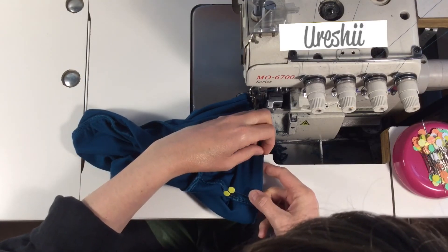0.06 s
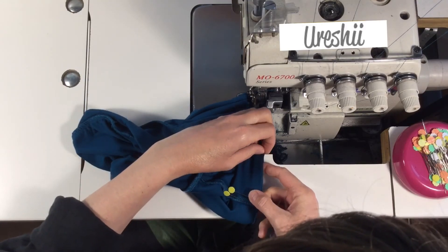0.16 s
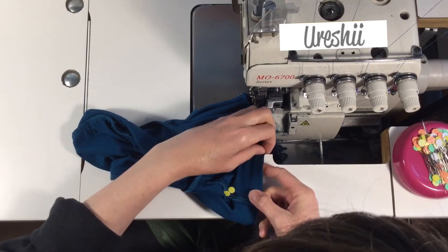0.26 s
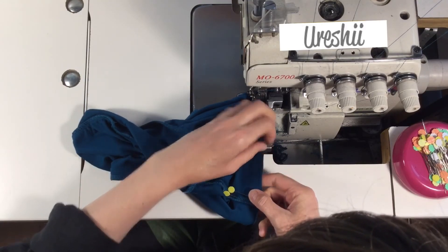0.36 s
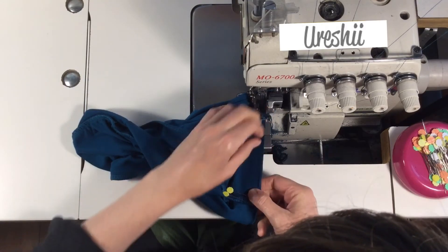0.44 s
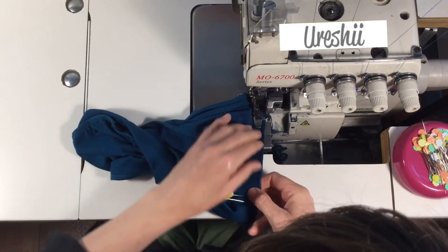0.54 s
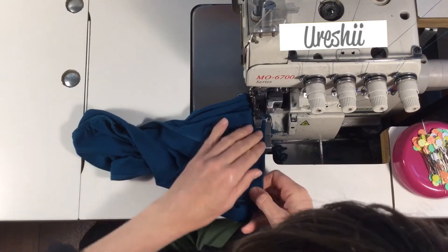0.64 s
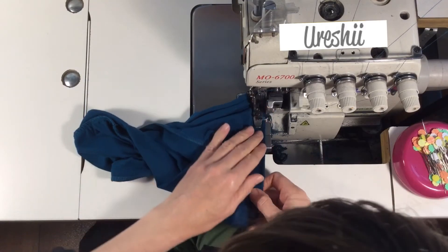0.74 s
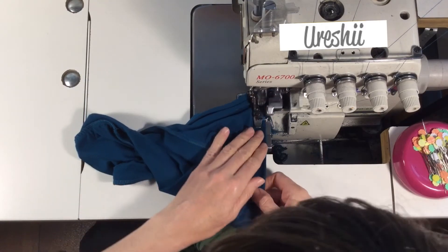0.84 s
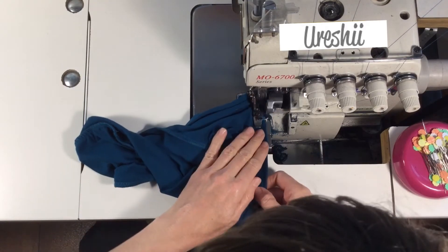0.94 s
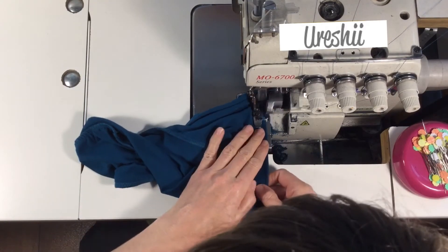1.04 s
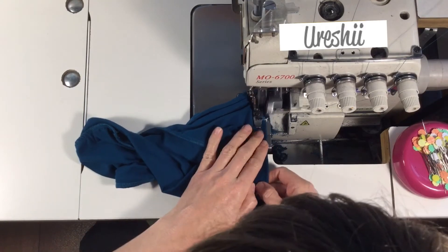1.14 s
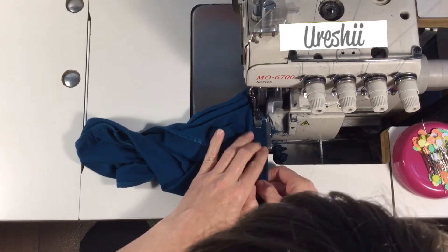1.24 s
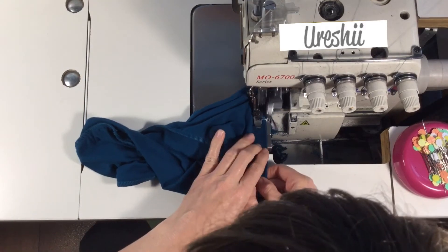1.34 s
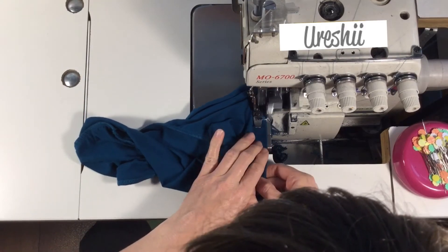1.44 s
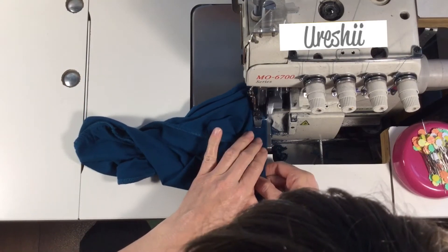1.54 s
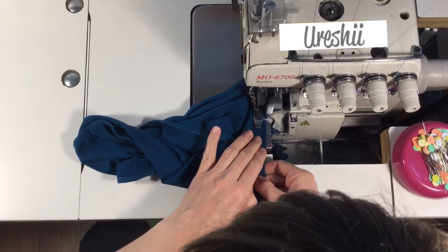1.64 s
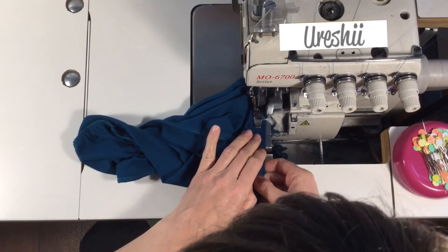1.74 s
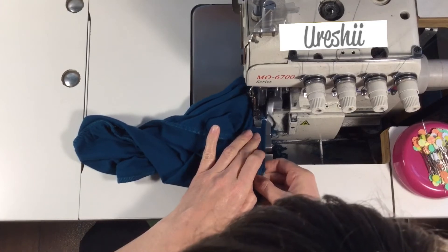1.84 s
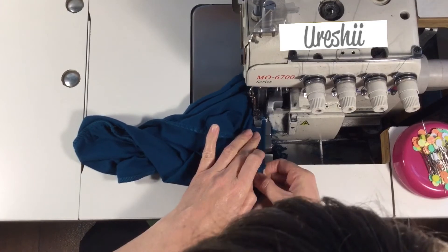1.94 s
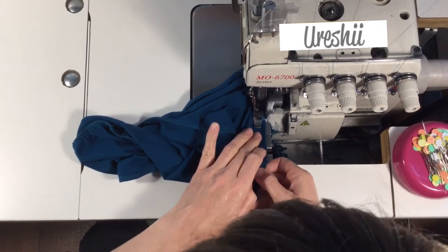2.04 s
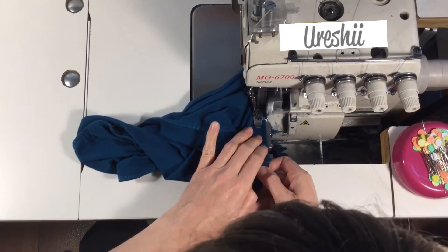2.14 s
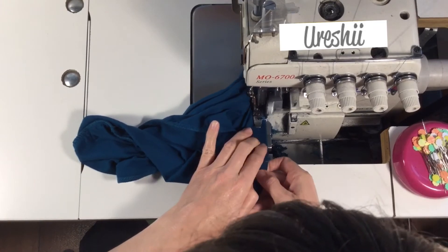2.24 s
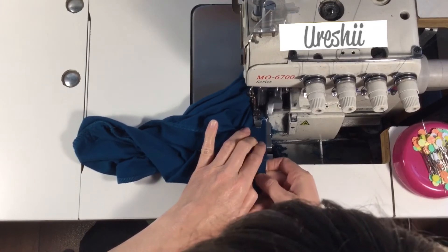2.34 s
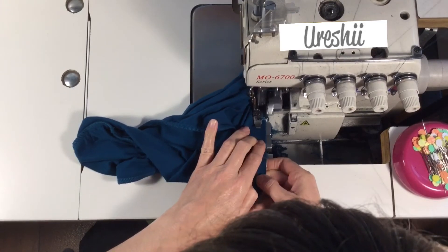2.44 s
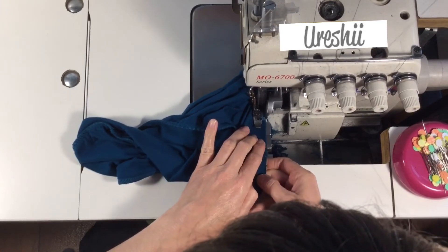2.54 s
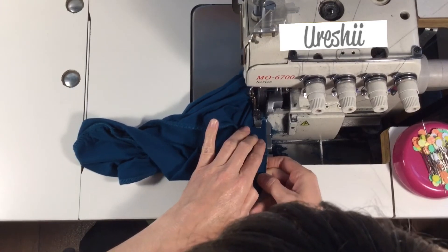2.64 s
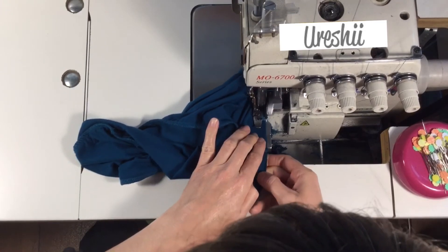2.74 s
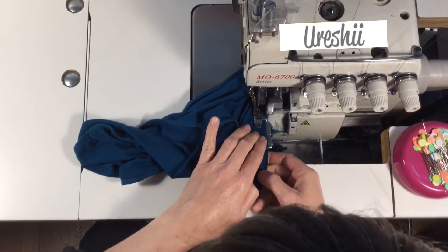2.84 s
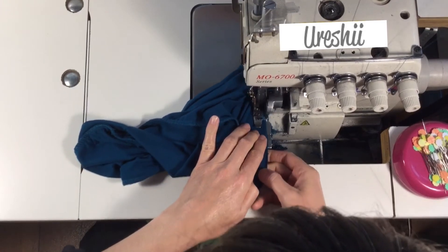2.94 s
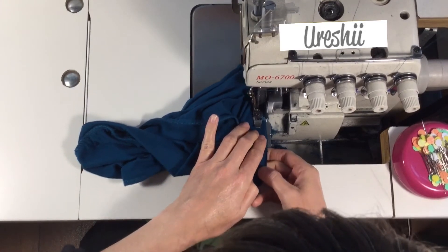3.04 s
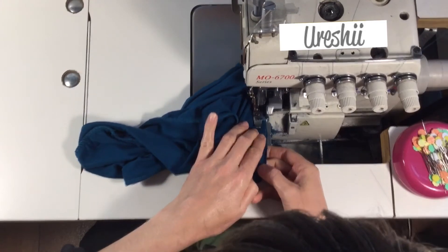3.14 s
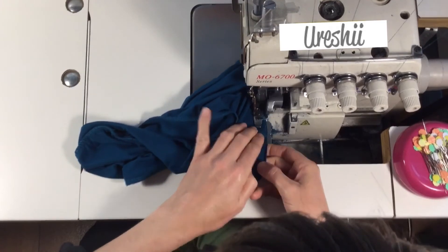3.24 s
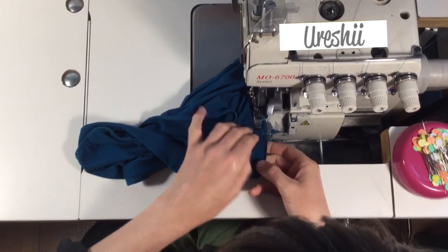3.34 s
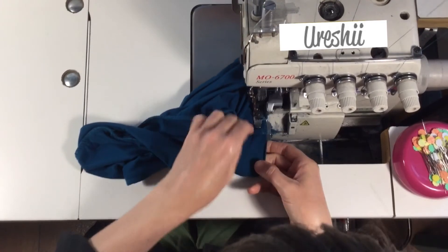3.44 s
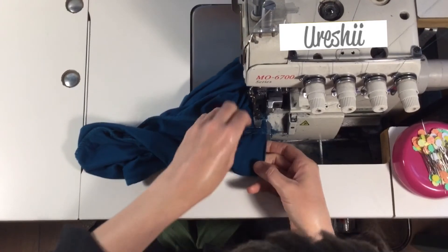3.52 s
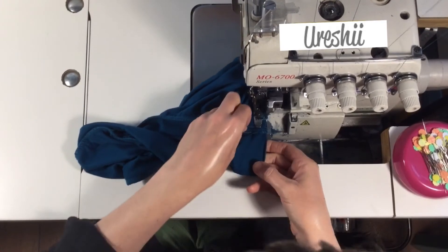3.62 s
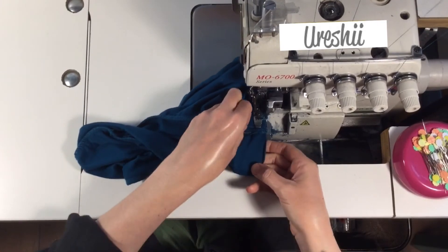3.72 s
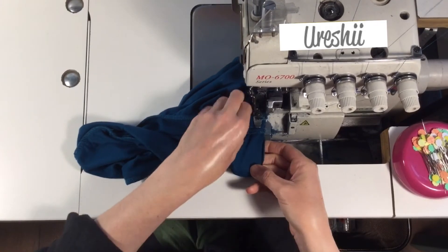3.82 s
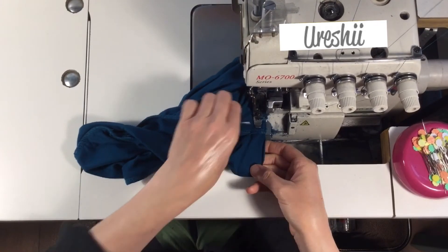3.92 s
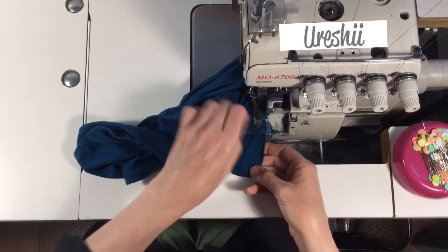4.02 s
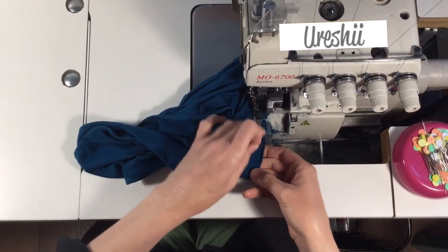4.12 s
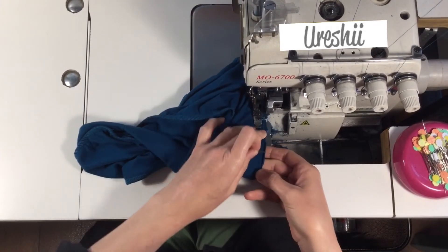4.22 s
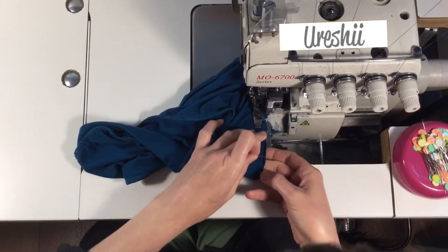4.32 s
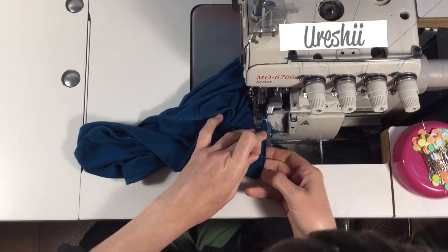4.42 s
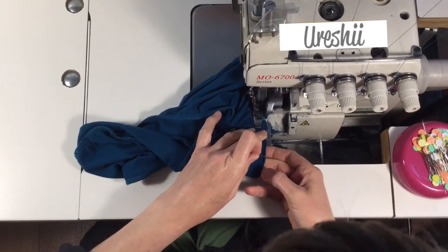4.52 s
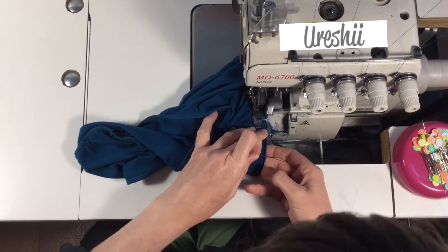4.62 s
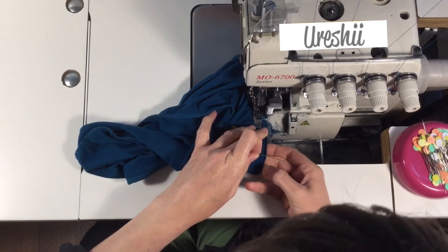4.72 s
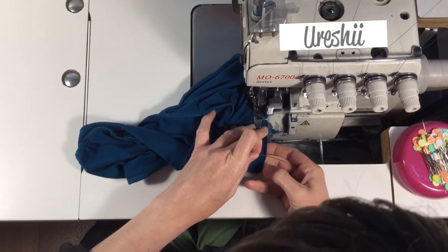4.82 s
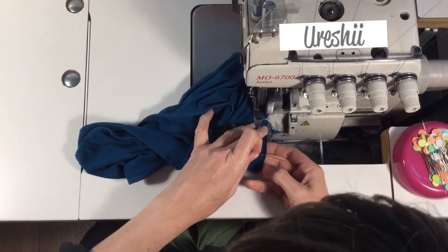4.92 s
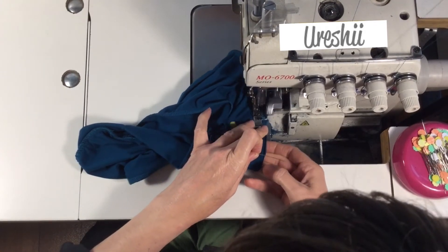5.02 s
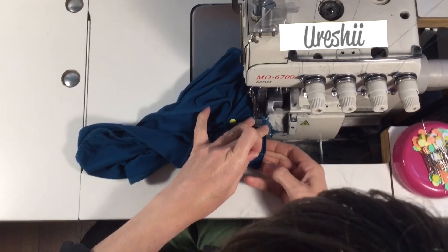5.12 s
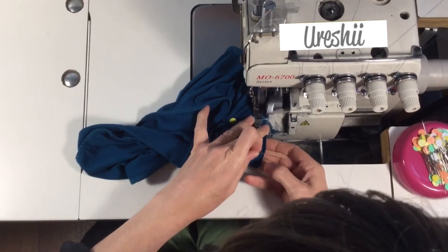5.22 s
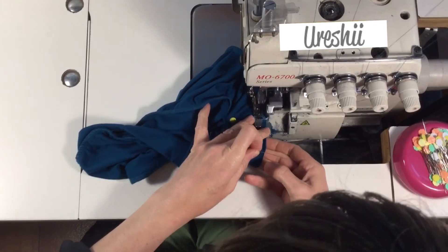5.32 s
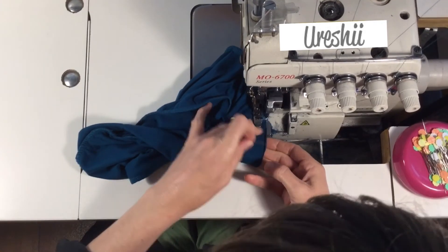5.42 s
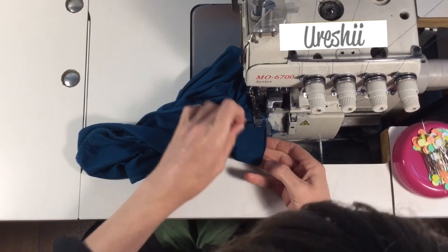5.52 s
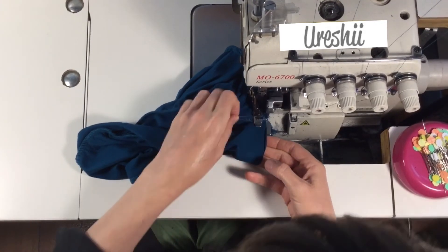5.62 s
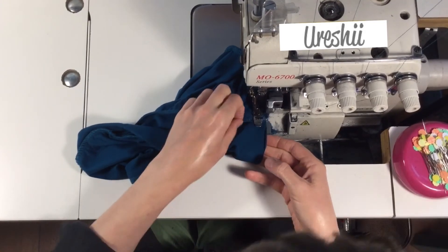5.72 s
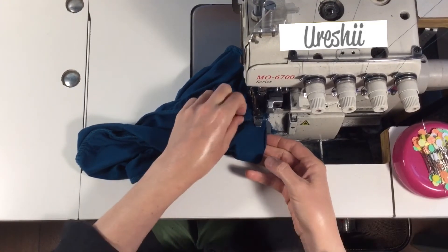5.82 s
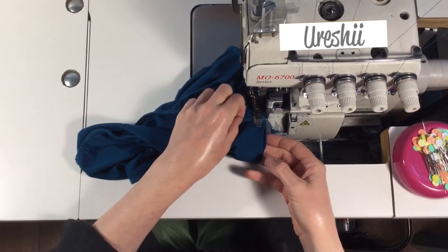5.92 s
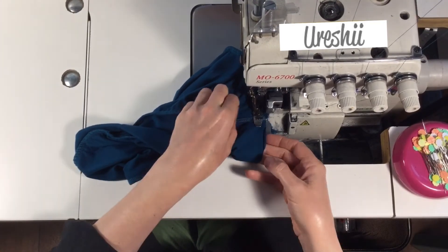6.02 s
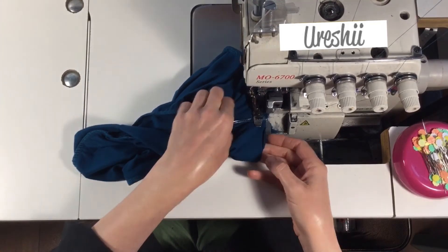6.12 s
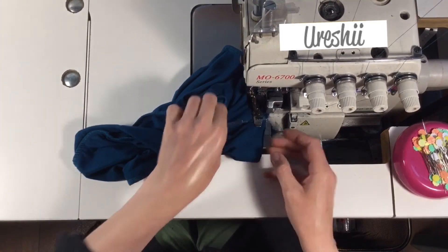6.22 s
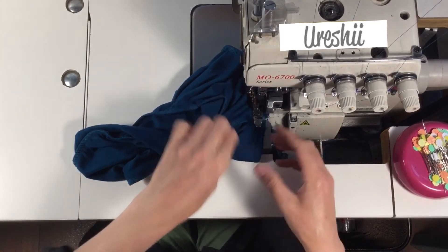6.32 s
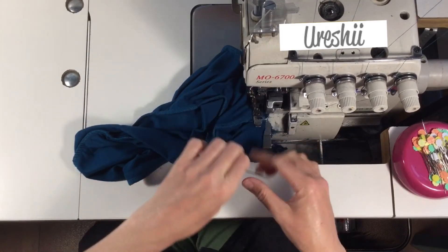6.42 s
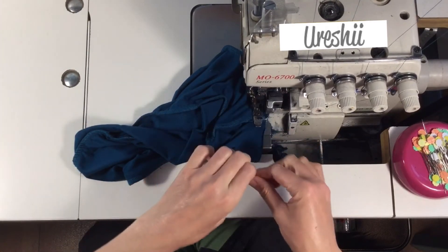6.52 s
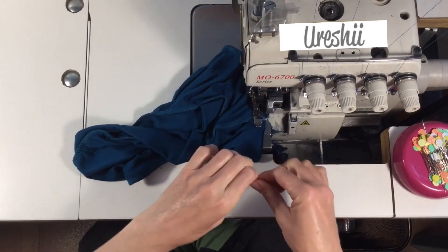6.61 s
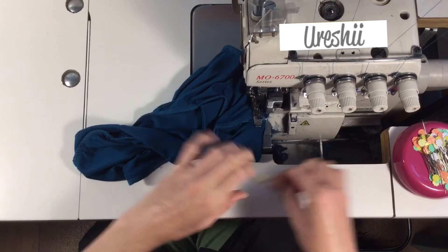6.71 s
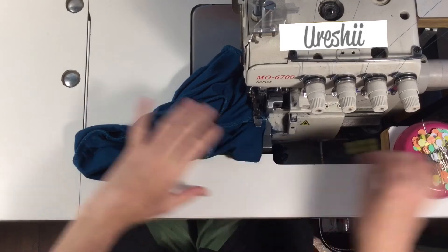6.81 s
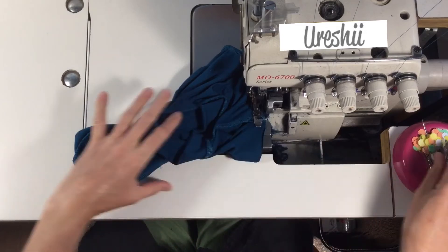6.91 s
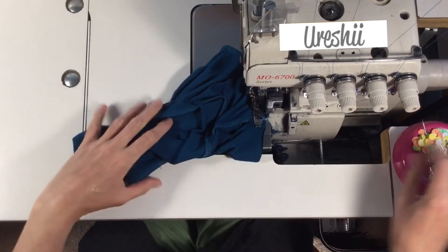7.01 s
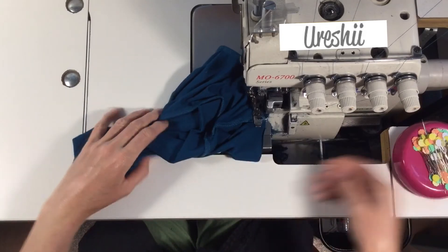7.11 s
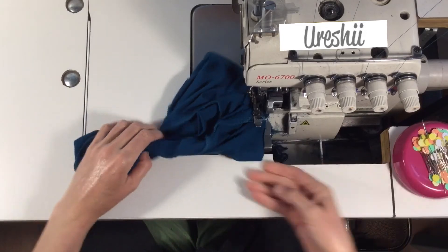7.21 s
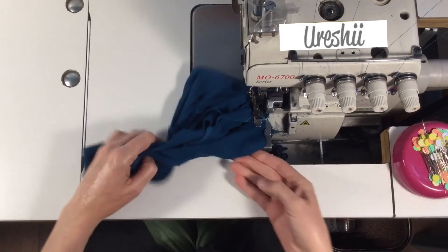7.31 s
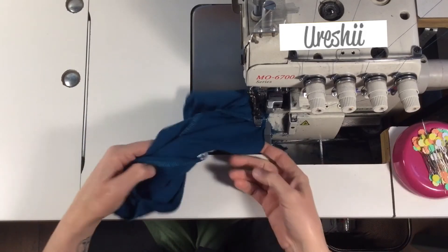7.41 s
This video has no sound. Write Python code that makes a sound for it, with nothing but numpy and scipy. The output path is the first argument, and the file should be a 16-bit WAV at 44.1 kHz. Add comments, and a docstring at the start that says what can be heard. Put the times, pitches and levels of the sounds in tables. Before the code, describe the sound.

An overlock sewing machine runs in two whining, clattering bursts, followed by the small clink of a tossed pin.

```python
"""Overlocker, two bursts.

In a small quiet room the pedal clunks and the clutch grabs a ringing pulley. The drive whines with
shaft speed, the linkage clatters, the table shakes and the knife snaps once a stitch until the brake
scrapes the machine to rest. Then a tossed pin skitters in a dish of pins and hands slide the fabric away."""
import sys
import numpy as np
from scipy import signal
from scipy.fft import rfft, irfft, next_fast_len
from scipy.io import wavfile
from scipy.ndimage import uniform_filter1d, map_coordinates

SR = 44100
rng = np.random.default_rng(int(sys.argv[2]) if len(sys.argv) > 2 else 0)


def dump(signal):
    """Clip the signal to [-1, 1] and save it as 16-bit WAV at the path in sys.argv[1]."""
    limited = np.clip(np.atleast_2d(signal).T, -1, 1)
    pcm = np.round(limited * 32767).astype(np.int16)
    wavfile.write(sys.argv[1], SR, pcm)


N = 328986
TIME_S = np.arange(N) / SR

# Table levels are relative; each source adds its own mix gains.
# shaft speed, one stitch a turn: time_s, turns_per_s
LONG_RUN = [(0.736, 3.69), (0.97, 6.91), (1.12, 15.08), (1.22, 21.26), (1.37, 22.72), (1.56, 19.19),
            (1.85, 18.34), (2.27, 18.97), (2.49, 17.31), (2.98, 17.33), (3.23, 16.21), (3.37, 8.34),
            (3.6, 1.0)]
SHORT_RUN = [(4.327, 4.61), (4.44, 5.16), (4.79, 10.54), (5.01, 17.35), (5.14, 16.52), (5.23, 8.7),
             (5.3, 5.0), (5.5, 1.0)]
# sewing bursts: speed_curve, clutch_release_s, snap_db
BURSTS = [(LONG_RUN, 3.24, -33.3), (SHORT_RUN, 5.14, -37)]
# knife bite into the cloth: time_s, level_db
BITE_CURVE = [(0.84, -46), (1.0, -35), (1.2, -34), (1.38, -34), (1.98, -31.5), (2.17, -39), (2.65, -33.5),
              (2.76, -39.5), (3.2, -32), (3.35, -47), (4.42, -45.5), (4.7, -44.5), (4.93, -34.5),
              (5.13, -34)]
# hard cuts through folds: time_s, extra_bite_db
FOLDS = [(1.207, 6), (1.96, 2.5), (3.2, 3.5), (4.805, 4.5)]
# whine partials: pitch_ratio
WHINE_RATIOS = [1, 2, 3, 3.5, 4]
# drive tone radiation from machine and table: pitch_hz, level_db
RADIATION = [(90, -72), (165, -53.5), (200, -54), (262, -61.5), (305, -39.5), (345, -55.5), (400, -45),
             (435, -51), (515, -47), (600, -57), (790, -58), (855, -51.5), (1030, -58), (1250, -57),
             (1560, -57.5), (2100, -69)]

# impacts: start_s, level_db
HEM_CLACKS = [(1.205, -36), (1.254, -44)]
CLUTCH_GRABS = [(0.735, -44.5), (4.326, -46), (5.37, -54)]
BRAKE_JOLTS = [(3.196, -35), (3.265, -31), (3.381, -32.5), (3.497, -46), (3.549, -66), (5.135, -31),
               (5.269, -39)]
PEDAL_CLUNKS = [(0.58, -41.5), (0.672, -39.5), (4.175, -40.5), (4.26, -43.5)]
METAL_RATTLES = [(7.262, -53), (7.289, -62), (7.308, -60)]
# brake bites: start_s, level_db, hold_s, t60_s
BRAKES = [(3.375, -40.5, 0.044, 0.18), (5.204, -38, 0.041, 0.15)]
# fingers on table and machine: start_s, level_db, pitch_hz
FINGER_TICKS = [(3.848, -65, 5300), (5.747, -62, 2850), (5.756, -65.5, 9900), (6.01, -67.5, 4850),
                (7.343, -58.5, 1200)]
# hands over fabric: centre_s, half_length_s, level_db
FABRIC_SLIDES = [(6.167, 0.061, -73), (7.19, 0.15, -71), (7.29, 0.063, -71.5)]

# resonances: pitch_hz, width_hz, level_db
HOLDER_MODES = [(596, 22, 9.5), (1220, 103, 1.5), (1840, 63, 5), (2980, 460, -4.5)]
PLATE_MODES = [(724.3, 11.3, -1), (850, 17, -15.5), (644, 18, 0)]
CASTING_MODES = [(584, 38, 5), (614, 7.9, 12.5), (1268, 410, 2.5), (1385, 47, 15), (1537, 65, 4.5),
                 (1895, 145, 8), (2770, 220, -5)]
PULLEY_MODES = [(3234, 85, 4.5), (3444, 122, 2), (3672, 50, 2), (3845, 100, -1.5), (4038, 65, -0.5),
                (8740, 360, -15)]
TABLE_MODES = [(134, 8.1, -0.5), (184.7, 9.2, -6.5), (305.7, 19.6, -3)]
DISH_MODES = [(1000, 180, -3.5), (1610, 88, -3), (5460, 400, -5.5)]
RATTLE_MODES = [(5370, 610, 2), (6700, 700, -5), (10000, 700, -2)]

# noise spectra: frequency_hz, density_db
SNAP_SPECTRUM = [(200, 8.5), (700, 0), (1900, -6), (2400, 4.5), (3100, 15.5), (5000, 5.5), (8000, 3.5),
                 (11000, -1), (15800, 0.5)]
CLATTER_SPECTRUM = [(120, -87), (300, 4), (850, 3), (1020, -7), (1900, 4.5), (2350, -5.5), (3000, -1.5),
                    (4500, -10), (7000, -22), (9000, -14.5), (10300, -37), (11500, -20.5), (15800, -14.5)]
RUMBLE_SPECTRUM = [(25, -40), (48, -4.5), (100, -1.5), (200, -5.5), (310, -14), (420, 4), (900, -83)]
SCRAPE_SPECTRUM = [(70, -43), (145, 3), (220, -30), (310, 4.5), (600, 7.5), (850, -1), (1450, -3.5),
                   (3000, -10.5), (5400, -11.5), (15800, -25)]
CLUNK_SPECTRUM = [(90, -9), (200, -8), (350, -2.5), (560, 1), (750, -8.5), (2300, -8.5), (2800, -16.5),
                  (4200, -13), (7200, -30), (15000, -32.5)]
PIN_SPECTRUM = [(120, -40), (220, -14), (700, -18), (1050, -16), (2500, -14.5), (3200, -12.5), (5500, -9.5),
                (10000, -9), (14000, 0.5), (15800, -3.5)]
AIR_SPECTRUM = [(15, -40), (25, -14.5), (64, -5.5), (157, -8.5), (194, -9.5), (276, -6.5), (316, -10),
                (461, -20), (672, -19.5), (1730, -30), (5520, -33.5), (15800, -40)]
# room decay: frequency_hz, t60_s
ROOM_DECAY = [(150, 0.36), (1000, 0.29), (5000, 0.27), (15000, 0.2)]


def knife(strokes, plate_drift=0.012):
    """Each stroke rubs in, snaps, rings the holder, squeaks and swings the cloth plate."""
    snaps, knocks, shears, squeaks, pushes = np.zeros((5, N))
    push_s = np.arange(round(0.02 * SR)) / SR
    swell = np.sin(np.pi * push_s / push_s[-1]) ** 0.88  # the plate builds up over several cycles
    scatter = rng.standard_normal((len(strokes), 2))
    for (s, snap_db, bite_db), (cut_scatter, knock_scatter) in zip(strokes, scatter):
        rub = 0.2 * fade(s - .008, 0.063)
        snaps += amp(snap_db) * (rub + 0.83 * fade(s + 0.0012, 0.0085) + 0.4 * fade(s + 0.0033, 0.031))
        onset = round((s + .001) * SR)
        knocks[onset] = amp((snap_db + bite_db) / 2 + 2 * knock_scatter)
        squeaks += amp(bite_db + 1.9 * cut_scatter) * fade(s + .0065, 0.0079, hold_s=0.0018)
        shears += amp(bite_db) * fade(s, 0.03, hold_s=0.012)  # the cloth loads the holder
        plate_hz = PLATE_MODES[0][0] * (1 + plate_drift * cut_scatter)
        swing = swell * np.sin(2 * np.pi * plate_hz * push_s + 1.1 * knock_scatter)
        pushes[onset:][:len(push_s)] += amp(bite_db) * swing
    cut = amp(-4) * coloured(snaps * white(), SNAP_SPECTRUM)
    cut += amp(-20.5) * ringing(squeaks * white(), [(11540, 790, 0)])
    holder = ringing(amp(-4) * snaps * white() + amp(5) * knocks, HOLDER_MODES)
    holder += amp(-19.5) * ringing(shears * white(), HOLDER_MODES[1:])
    plate = amp(-24.5) * ringing(pushes, PLATE_MODES) + amp(-4) * pushes
    return room(cut + holder, wet_db=-5.5) + plate


def knife_strokes(first_cut_turn=.45, scatter_db=1.0):
    """One stroke a turn until the brake bites: start_s, snap_db, bite_db."""
    strokes = []
    for (run, _, snap_db), (brake_s, *_) in zip(BURSTS, BRAKES):
        turns = np.cumsum(shaft_speed(run)) / SR
        last_turn = np.interp(brake_s, TIME_S, turns)
        for s in np.interp(np.arange(first_cut_turn, last_turn), turns, TIME_S):
            fold_db = sum(db for fold_s, db in FOLDS if abs(s - fold_s) < .02)
            bite_db = np.interp(s, *np.transpose(BITE_CURVE)) + fold_db
            strokes.append((s, snap_db + scatter_db * rng.normal(), bite_db + scatter_db * rng.normal()))
    return strokes


def hem_clacks():
    """A thick hem jars the knife holder, ringing one bright mode."""
    jars = sum(amp(db) * fade(s, 0.029, hold_s=0.013) for s, db in HEM_CLACKS)
    return room(amp(-1) * ringing(jars * white(), HOLDER_MODES[2:3]), wet_db=-10)


def shaft_speed(run):
    """Turns per second through one burst, zero outside it."""
    return np.interp(TIME_S, *np.transpose(run), left=0, right=0)


def drive_whine(turns, cycles_per_turn=23, lag_s=.022):
    """Drive tones swell as they sweep through resonances; gruff when slow or strained."""
    turns = np.interp(TIME_S - lag_s, TIME_S, turns)  # resonances trail the shaft
    shaft_hz = uniform_filter1d(np.gradient(turns) * SR, size=2600).clip(0)  # handwheel inertia
    strain = np.clip(np.abs(np.gradient(shaft_hz)) * SR / 70, 0, 1)
    engaged = np.clip(shaft_hz - 4, 0, 1)  # silent at a crawl
    judder = np.clip(.7 * strain + (17 - shaft_hz) / 12, 0, 1)
    tones = np.zeros(N)
    for ratio in WHINE_RATIOS:
        flutter_db = 1.4 * np.sqrt(ratio) * wobble(28) + 4.5 * judder * wobble(70)
        slip_rad = ratio * .15 * wobble(45) + .85 * np.sqrt(ratio) * judder * wobble(90)
        overtone_db = 0 if ratio == 1 else -4.5 - 18.5 * judder
        radiated_db = log_interp(RADIATION, ratio * cycles_per_turn * shaft_hz)
        phase_rad = 2 * np.pi * ratio * cycles_per_turn * turns + slip_rad
        tones += amp(radiated_db + overtone_db + flutter_db) * np.sin(phase_rad)
    return engaged * amp(3.5 + 1.8 * strain) * tones


def linkage(turns, gain, strokes):
    """Loopers, needle bar and feed rattle in the casting, hardest around each knife stroke."""
    load = 1 + .5 * sum(fade(s - .006, 0.04, hold_s=0.014) for s, _, _ in strokes)
    force = gain * load * shaft_contacts(turns, rolling=0.57, per_turn=90)
    clatter = amp(-4.5) * coloured(force, CLATTER_SPECTRUM)
    return room(clatter + amp(-7.5) * ringing(force, CASTING_MODES), wet_db=-2)


def pulley(turns, gain):
    """The pulley rings as it turns; clutch knocks ring it along with the casting and table."""
    running = amp(-1.5) * gain * shaft_contacts(turns, rolling=1.28, per_turn=45)
    grabs = sum(amp(db) * fade(s, 0.07) for s, db in CLUTCH_GRABS) * white()
    knock = amp(-2.5) * ringing(grabs, CASTING_MODES) + amp(2.5) * ringing(grabs, TABLE_MODES)
    return room(ringing(running + grabs, PULLEY_MODES) + knock, wet_db=-6.5)


def shaft_contacts(turns, rolling, per_turn, scatter_db=2.5):
    """Small impacts at the same shaft angles each turn, over rolling noise."""
    angles, sizes = rng.random(per_turn), rng.standard_normal(per_turn)
    onsets = np.interp(np.arange(int(turns[-1]) + 1)[:, None] + angles, turns, np.arange(N))
    blows = sizes * amp(scatter_db * rng.standard_normal(onsets.shape)) * (onsets < N - 1)
    train = np.bincount(onsets.astype(int).ravel(), blows.ravel(), N)
    train /= np.sqrt(np.gradient(turns) * SR + 1)  # evens out power over speed
    return unit_rms(unit_rms(train) + rolling * white())


def freewheel(step_db=-4, fall_db_per_s=17):
    """Pulley level change in dB as the machine runs out with the clutch open."""
    drop_db = np.zeros(N)
    for run, release_s, _ in BURSTS:
        coasting = (TIME_S > release_s) * (TIME_S <= run[-1][0])
        drop_db += coasting * (step_db - fall_db_per_s * (TIME_S - release_s))
    return uniform_filter1d(drop_db, size=2000)


def sewing_table(gain):
    """The table rumbles under the running machine and thumps when the brake jolts it."""
    thumps = np.zeros(N)
    for s, db in BRAKE_JOLTS:
        swing = np.sin(2 * np.pi * TABLE_MODES[0][0] * (TIME_S - s))
        thumps += amp(db) * fade(s, 0.083, hold_s=0.0047) * swing
    shake = amp(-13) * coloured(white(), RUMBLE_SPECTRUM) + amp(-20.5) * ringing(white(), TABLE_MODES)
    settling = sum(amp(db) * fade(s, 0.42) for s, db in BRAKE_JOLTS)
    return amp(-8.5) * thumps + gain * shake + amp(-11) * ringing(settling * white(), TABLE_MODES)


def brake():
    """The brake bites with a gritty scrape."""
    pressure = sum(amp(db) * fade(s, t60_s, hold_s) for s, db, hold_s, t60_s in BRAKES)
    grit = unit_rms(white() * amp(1.5 * wobble(350)))
    return room(amp(-2.5) * coloured(pressure * grit, SCRAPE_SPECTRUM), wet_db=-8)


def pedal():
    """Pedal and rod knock and rattle before each burst."""
    blows = sum(amp(db) * (fade(s + 0.0036, 0.012) + 0.23 * fade(s + 0.0015, 0.21))
                for s, db in PEDAL_CLUNKS)
    padded = uniform_filter1d(blows, size=200)
    return room(amp(-2) * coloured(padded * white(), CLUNK_SPECTRUM), wet_db=3)


def tossed_pin(start_s=6.876, gap_s=0.0036, touches=7, graze_db=-11):
    """A pin grazes the others, skitters over them and rings the dish."""
    hits = np.zeros(N)
    for k, (scatter_db, jitter) in enumerate(rng.standard_normal((touches, 2))):
        s = start_s + gap_s * (k + 0.12 * jitter)
        hits += amp(-28 + scatter_db + graze_db * (k == 0)) * (fade(s, 0.0055) + 0.15 * fade(s, 0.098))
    pins = amp(-1) * coloured(hits * white(), PIN_SPECTRUM)
    dish = amp(-17) * ringing(hits * white(), DISH_MODES)
    return room(pins + dish, wet_db=-8)


def metal_rattle():
    """Small metal parts jingle as the fabric is drawn away."""
    hits = sum(amp(db) * fade(s, 0.045) for s, db in METAL_RATTLES)
    return room(ringing(hits * white(), RATTLE_MODES), wet_db=-7)


def hands():
    """Fingers tick on hard surfaces and brush the fabric along in small catches."""
    ticks = sum(ringing(amp(db) * fade(s, 0.043) * white(), [(hz, 0.65 * hz, 0)])
                for s, db, hz in FINGER_TICKS)
    slides = sum(amp(db) * np.exp(-((TIME_S - s) / half_s) ** 2) for s, half_s, db in FABRIC_SLIDES)
    catches = unit_rms(white() * amp(4 * wobble(160)))
    cloth = coloured(slides * catches, [(200, 10.5), (1500, -0.5), (4000, -1.5), (14000, 0.5)])
    return room(amp(2) * ticks + cloth, wet_db=-3.5)


def room_air():
    """Faint low noise, slightly wavering."""
    return amp(-67 + 0.69 * wobble(18)) * coloured(white(), AIR_SPECTRUM)


def room(x, wet_db):
    """x plus a room tail whose treble dies first."""
    hz, time_s, noise = signal.stft(rng.standard_normal(SR // 2), SR, nperseg=256)
    decay = amp(-60 * time_s / log_interp(ROOM_DECAY, hz)[:, None])
    tail = signal.istft(noise * decay, SR, nperseg=256)[1]
    tail = np.pad(tail / np.linalg.norm(tail), (SR // 250, 0))  # 4 ms pre-delay
    return x + amp(wet_db) * signal.fftconvolve(x, tail)[:N]


def ringing(x, modes):
    """x through causal resonances of alternating sign."""
    return filtered(x, lambda hz: sum(
        (-1) ** k * amp(db) * 1j * hz * width_hz / (pitch_hz ** 2 - hz ** 2 + 1j * hz * width_hz)
        for k, (pitch_hz, width_hz, db) in enumerate(modes)))


def coloured(x, spectrum):
    """x with a broad spectral shape."""
    return filtered(x, lambda hz: amp(log_interp(spectrum, hz)))


def filtered(x, response):
    """x through a frequency response scaled to unit mean power."""
    size = next_fast_len(N + SR // 2)
    gain = response(np.fft.rfftfreq(size, 1 / SR))
    return irfft(rfft(x, size) * gain / np.sqrt(np.mean(np.abs(gain) ** 2)), size)[:N]


def fade(start_s, t60_s, hold_s=0):
    """Envelope: jump, hold, decay; 0.5 s at most."""
    envelope = np.zeros(N)
    span = envelope[round(start_s * SR):][:SR // 2]
    span[:] = amp(-60 * np.maximum(np.arange(len(span)) / SR - hold_s, 0) / t60_s)
    return envelope


def wobble(rate_hz):
    """Smooth random curve."""
    return map_coordinates(rng.standard_normal(int(N * rate_hz / SR) + 4), [TIME_S * rate_hz])


def white():
    """Fresh white noise."""
    return rng.standard_normal(N)


def log_interp(points, hz):
    """Points read on a log frequency axis."""
    knots_hz, values = np.transpose(points)
    return np.interp(np.log(hz + 1), np.log(knots_hz + 1), values)


def unit_rms(x):
    """x at rms 1."""
    return x / np.sqrt(np.mean(x ** 2) + 1e-20)


def amp(db):
    """Decibels to gain."""
    return 10 ** (np.asarray(db) / 20)


def scene(cruise_turns_per_s=18):
    """Shaft speed drives the machine and its table; handling noises and room air around it. Mono."""
    turns_per_s = sum(shaft_speed(run) for run, _, _ in BURSTS)
    turns = np.cumsum(turns_per_s) / SR
    pace = turns_per_s / cruise_turns_per_s
    strokes, runout_db = knife_strokes(), freewheel()
    machine = amp(0.46 * runout_db) * drive_whine(turns)
    machine += linkage(turns, amp(-50.5) * pace, strokes)
    machine += pulley(turns, amp(-47 + runout_db) * pace ** 0.87)
    machine += knife(strokes) + hem_clacks()
    machine += sewing_table(amp(-49.5) * pace ** 0.99)
    return (machine + pedal() + brake() + tossed_pin() + metal_rattle() + hands() + room_air())[None]


def record(dry, low_cut_hz=40., top_hz=15830):
    """Fourth-order low cut and a hard treble limit."""
    hz = np.fft.rfftfreq(N, 1 / SR)
    low_cut = hz ** 4 / np.sqrt(hz ** 8 + low_cut_hz ** 8)
    return irfft(rfft(dry) * low_cut * (hz < top_hz), N)


dry = scene()
out = record(dry)
dump(out)
```